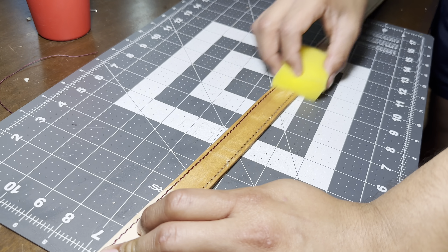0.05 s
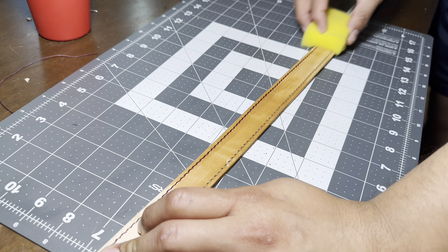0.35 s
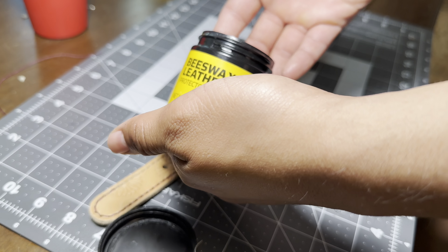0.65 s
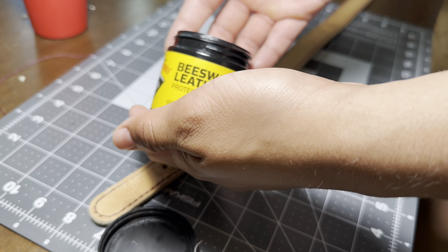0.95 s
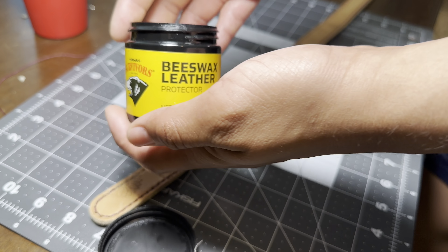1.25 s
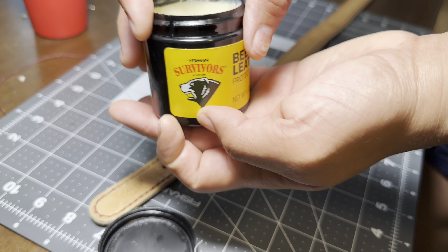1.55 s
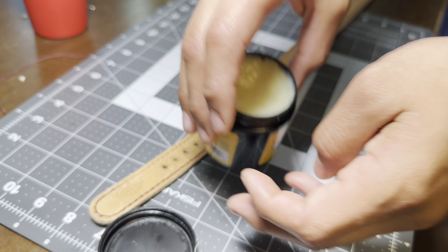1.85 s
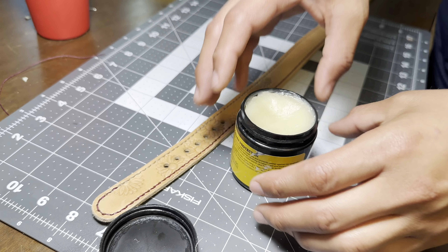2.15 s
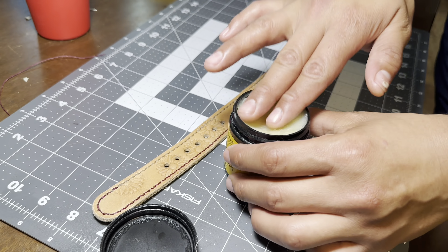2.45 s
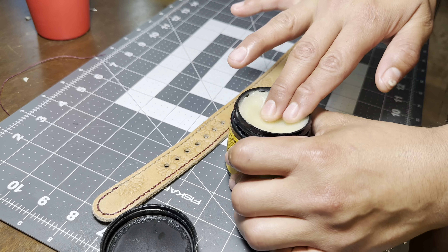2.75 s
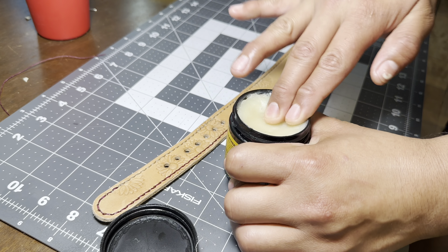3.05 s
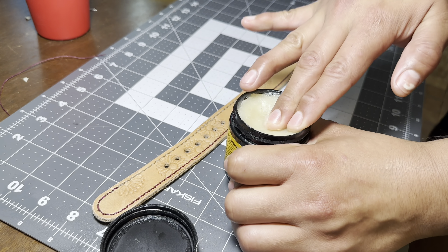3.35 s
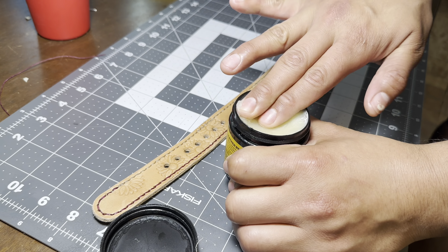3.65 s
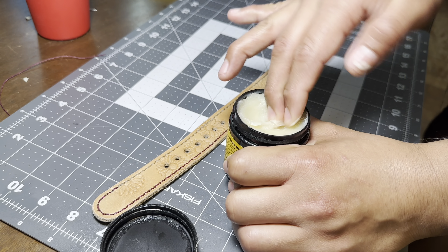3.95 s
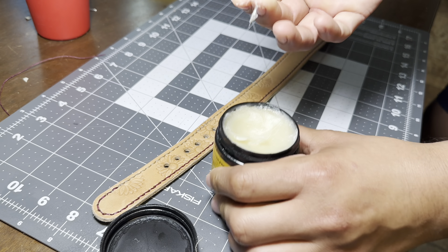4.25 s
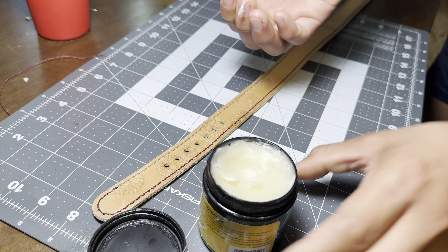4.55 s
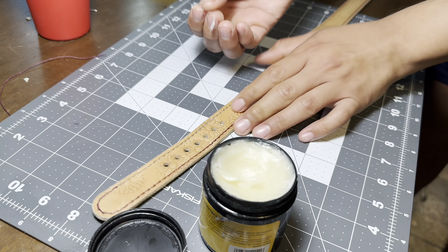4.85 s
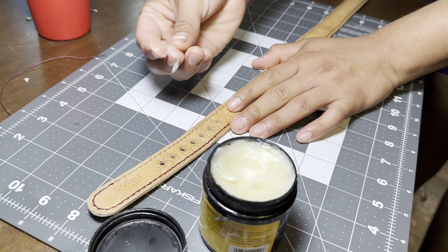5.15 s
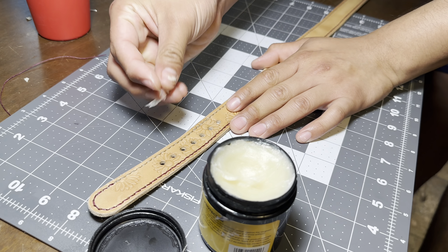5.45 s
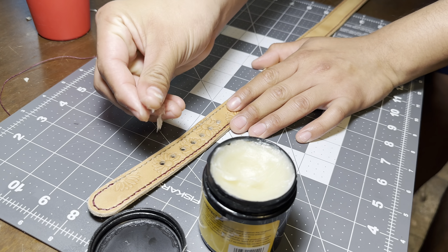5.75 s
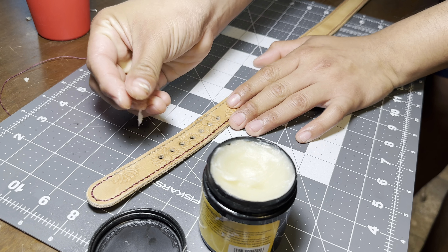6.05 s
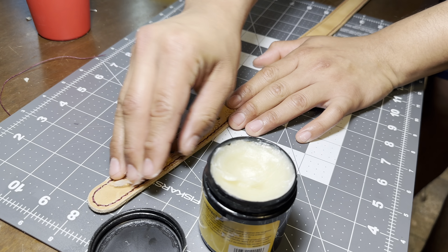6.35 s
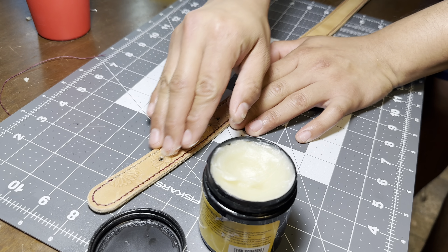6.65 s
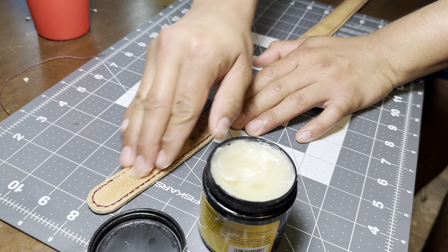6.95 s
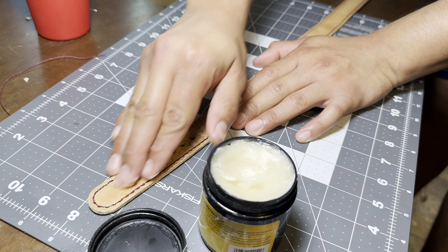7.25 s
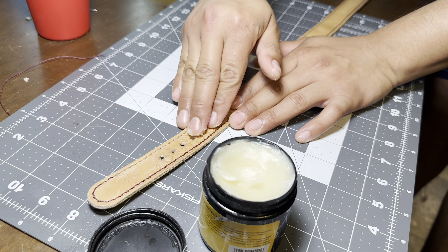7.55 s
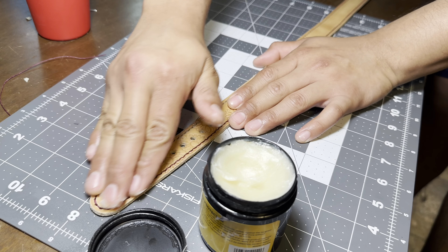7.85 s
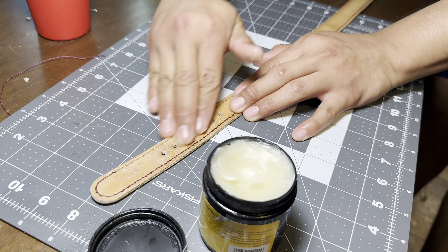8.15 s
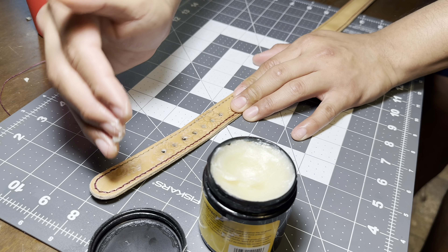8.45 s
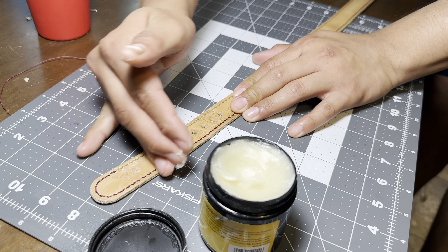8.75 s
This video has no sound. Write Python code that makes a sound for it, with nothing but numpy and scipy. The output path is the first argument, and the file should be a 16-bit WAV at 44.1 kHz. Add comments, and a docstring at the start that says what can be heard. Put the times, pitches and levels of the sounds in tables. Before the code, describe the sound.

A sponge wipes leather, a jar knocks down on a desk, then fingers scoop sticky wax and pat it into a strap.

```python
"""A leather strap is waxed on a cutting mat on a wooden desk, in a small room with a low hum.
First a sponge wipes the strap, its tiny slips blurring into hiss. A jar of wax slips out of a palm and is
set down hard, so the desk thuds and rings. Fingers scoop the sticky wax, whose threads snap, and push the
jar aside. A hand slides in to hold the strap, with a rising hollow note from the air under it.
Last, fingertips rub and pat the wax into the leather."""
import sys
import numpy as np
from scipy import signal
from scipy.fft import rfft, irfft, next_fast_len
from scipy.io import wavfile
from scipy.ndimage import uniform_filter1d

SR = 44100
rng = np.random.default_rng(int(sys.argv[2]) if len(sys.argv) > 2 else 0)


def digitize_waveform(pressure):
    """Quantize a signal to 16-bit integers and store it at the path in sys.argv[1].

    Rows of a 2-D input are taken as channels; values are limited to [-1, 1].
    """
    field = np.atleast_2d(pressure).T
    bounded = np.clip(field, -1, 1)
    quanta = np.round(bounded * 32767).astype(np.int16)
    wavfile.write(sys.argv[1], SR, quanta)


N = 397341
TIME = np.arange(N) / SR
HIT_TIME = TIME[:SR // 2]   # the clock for one short sound

# steady tones of distant motors: (pitch [Hz], level [dB])
HUM_TONES = [(49.3, -61.5), (70.5, -60.5), (101, -76)]
# the colour of each noise, or how strong it is from low to high: (frequency [Hz], level [dB])
BACKGROUND_COLOUR = [(15, -23), (28, -17.5), (40, -11.5), (65, -4.5), (110, -13.5), (200, -26.5),
                     (450, -37.5), (1000, -45.5), (2000, -42.5), (4000, -46.5), (6500, -31.5), (9500, -58),
                     (14000, -57.5)]
SPONGE_COLOUR = [(200, -1.5), (350, -0.5), (550, 0), (800, -5), (1500, -3), (3000, -1), (5000, -4.5),
                 (8500, 0), (11000, -4), (15000, -2.5)]
THUD_COLOUR = [(40, -17), (85, -5.5), (150, -9.5), (350, -1), (600, 1.5), (760, -1), (950, -9.5),
               (1400, -19), (2500, -36), (8000, -55.5)]
BOOM_COLOUR = [(90, -0.5), (140, 9), (230, -2), (400, -36), (2000, -70)]
PALM_COLOUR = [(250, -20), (650, -17), (1100, -7.5), (2000, -5.5), (3200, -5), (5000, 0), (8500, -1.5),
               (14000, -14)]
CRACK_COLOUR = [(500, -2.5), (1400, 4), (2400, -3.5), (3200, -2.5), (4400, -14), (6500, -12), (10000, -20),
                (15000, -25)]
JAR_COLOUR = [(170, -9), (250, -9.5), (350, -0.5), (480, 2), (590, 8), (740, -4.5), (920, -5), (1400, -7.5),
              (2200, -18), (4000, -37), (8500, -40.5), (15000, -48.5)]
WAX_COLOUR = [(200, -2), (400, 2.5), (600, -1), (850, -8), (1300, -12.5), (2500, -8), (4500, -11.5),
              (8500, -14), (14000, -21.5)]
SNAP_COLOUR = [(1000, -63), (3000, -9), (6000, -12), (8500, 5), (14500, 13), (16000, -22.5)]
HAND_COLOUR = [(200, -0.5), (380, -9), (560, 2.5), (800, 1.5), (1250, 7), (2300, 5.5), (4000, -9.5),
               (7000, -12.5), (10000, -20.5), (15000, -27.5)]
STRAP_COLOUR = [(200, -10), (400, -1), (570, -6), (780, -8.5), (1200, -5.5), (1950, -9), (2600, -5.5),
                (4500, -4.5), (8500, -1), (11000, -5), (15000, -3)]
PAT_COLOUR = [(150, -1), (300, 5), (560, 7), (780, 1.5), (1100, 8), (1900, 6), (2500, -3), (3200, -1),
              (5000, -8.5), (8000, -16), (15000, -81)]
# resonances, the narrow bands where an object changes a noise: (centre [Hz], width [Hz], boost [dB])
MAT_PEAKS = [(558.4, 5.3, 10.8), (1215, 120, 7.1), (1926, 19, 9.7)]
JAR_PEAKS = [(352, 31, 12.5), (600, 91, -4.5), (930, 15, 14), (1100, 240, 5.5)]
STRAP_PEAKS = [(565, 55, 8), (1100, 100, 4), (1340, 90, 4), (1960, 90, 6), (2610, 140, 2), (3170, 130, 3)]
# the tones an object rings with when struck: (pitch [Hz], level [dB], time to fade by 60 dB [s])
DESK_TONES = [(80, -18.5, 0.12), (136.6, -24, 0.34), (213, -20, 0.27), (259.5, -13, 0.12),
              (365.5, 2, 0.027), (341.5, -12, 0.24), (382, -18.5, 0.073), (467.4, -17.5, 0.6),
              (568.5, -7.5, 0.12), (600, -15.5, 0.21), (650, -13, 0.069), (726, -17, .15), (850, -25, 0.15),
              (928, -24, 0.26), (1144, -27.5, 0.18), (1330, -29, 0.1)]
JAR_TONES = [(1150, -5, .016), (1420, 0, .014), (1900, -4, .014), (2650, -7, .014), (3200, -5, .018),
             (6300, -14, .012)]
STRAP_TONES = [(368, -5.5, 0.25), (559, 17, 0.14), (1018, 14, 0.074), (1166, 3, 0.11), (1520, -15, 0.15),
               (1896, 18, 0.18), (2450, -20.5, 0.048), (3200, -27.5, 0.048)]
# rubbing strokes: (start [s], length [s], scrape below 3 kHz [dB], hiss above 3 kHz [dB])
SPONGE_WIPES = [(-0.07, .31, -61.5, -47.5), (0.255, .11, -67.5, -55.5), (0.36, 0.12, -71.5, -56),
                (0.45, 0.11, -71.5, -62.5), (0.588, .08, -66, -57)]
PALM_SLIPS = [(1.22, 0.29, -59, -68.5), (1.37, 0.21, -69.5, -75), (1.575, 0.13, -77.5, -71.5),
              (1.78, 0.137, -78.5, -69), (2.2, 0.19, -67.5, -79)]
JAR_SHOVES = [(2.03, 0.22, -51.5, -55), (2.11, 0.097, -52.5, -65), (4.095, 0.35, -42.5, -59),
              (4.31, 0.18, -54.5, -61.5), (4.38, 0.23, -64.5, -70.5)]
WAX_SCOOPS = [(2.378, 0.07, -58.5, -63), (2.44, 0.13, -55, -69), (2.58, 0.091, -79.5, -72),
              (2.665, 0.069, -59, -71.5), (2.73, 0.28, -70, -69), (2.835, 0.055, -63, -76),
              (2.97, 0.26, -71.5, -73), (3.17, 0.24, -68.5, -75), (3.45, 0.19, -75, -74),
              (3.63, 0.22, -68.5, -73), (3.82, 0.16, -71.5, -80.5), (3.985, 0.092, -57, -63)]
HAND_SLIDES = [(4.66, 0.44, -48, -55), (4.72, 0.47, -48, -42.5)]
FINGER_RUBS = [(5.765, 0.12, -71, -75.5), (6.36, .18, -75.5, -64.5), (6.645, 0.19, -73, -62.5),
               (6.86, 0.23, -70, -61), (7.135, 0.22, -65.5, -62), (7.355, 0.19, -67.5, -60),
               (7.605, 0.2, -68.5, -61.5), (7.845, 0.26, -62, -57.5), (8.09, .19, -68, -65.5),
               (8.58, 0.47, -69.5, -63.5)]
# soft low thuds on the desk, from the hands and the rocking jar: (time [s], level [dB])
SOFT_THUDS = [(0.168, -53.5), (0.397, -55), (0.995, -60.5), (2.549, -50), (2.851, -42), (3.045, -55.5),
              (3.467, -59.5), (3.558, -57), (3.9856, -46), (4.845, -37.5), (5.2969, -40.5), (5.435, -50.5),
              (6.446, -52.5), (8.212, -55.5)]
# hand taps, wax squelches and a tap on the jar: (time [s], level [dB], pitch [Hz], width [Hz], time to fade by
# 60 dB [s])
HOLLOW_TAPS = [(1.111, -55, 1684, 1840, 0.2), (2.456, -35.5, 1100, 204, 0.17),
               (2.456, -42, 2956, 700, 0.12), (3.062, -56.5, 1310, 901, 0.14),
               (3.178, -53.5, 1620, 600, 0.13), (3.255, -58.5, 986, 400, 0.15),
               (3.292, -52, 1100, 507, 0.046), (3.487, -51, 3200, 2000, 0.011),
               (3.546, -60, 1100, 398, 0.036), (3.718, -51, 1370, 905, 0.15),
               (4.0402, -36.5, 2240, 1810, 0.011), (4.7649, -21, 1313, 606, 0.017),
               (5.245, -55, 1910, 1194, 0.095), (5.2963, -39.5, 756, 712, 0.063),
               (5.4356, -57.5, 652, 400, 0.047)]
# the jar lands, rocks, settles, and later jolts when shoved: (time [s], thud [dB], crack [dB])
JAR_KNOCKS = [(1.8886, -6, -5), (1.9002, -11, -12.5), (1.9114, -6, -5), (1.948, -47, -18.5),
              (1.968, -15, -17), (2.025, -54, -33), (2.033, -31.5, -47), (2.069, -50, -33.5),
              (2.1037, -47.5, -38), (2.159, -33, -36.5), (4.385, -35.5, -38)]
# the loudest wax threads snap: (time [s], level [dB])
WAX_SNAPS = [(2.3994, -45), (2.4089, -52), (2.7416, -47.5), (2.7633, -42.5), (3.0235, -47.5),
             (3.0792, -44.5), (3.1213, -41), (3.46, -43), (3.487, -29), (3.5029, -37.5), (3.516, -40.5),
             (4.0415, -37.5), (7.94, -36), (8.267, -50)]
# the note of the air under the sliding hand: (time [s], pitch [Hz], level [dB])
HOLLOW_NOTE = [(4.75, 1275, -79), (4.775, 1280, -44), (4.828, 1280, -49.5), (4.881, 1400, -41),
               (4.921, 1750, -54), (4.959, 2285, -40.5), (5.02, 2455, -65), (5.119, 2380, -86.5)]
# fingertips land on the strap: (time [s], level [dB])
FINGER_PATS = [(6.318, -42), (6.442, -51), (6.629, -35.5), (7.156, -29), (7.18, -40), (7.627, -32),
               (7.701, -51), (8.139, -33.5), (8.212, -47.5), (8.561, -38), (8.986, -49)]
# first echoes from near surfaces: (delay [s], level [dB])
NEAR_ECHOES = [(.0082, -16.5), (0.0106, -12)]
# how long the room rings: (frequency [Hz], time to fade by 60 dB [s])
ROOM_FADE = [(100, 0.99), (400, 0.47), (1500, 0.23), (4000, 0.32), (8000, 0.21), (15000, 0.16)]
# how alike left and right are: (frequency [Hz], likeness [1 same, -1 opposite])
STEREO_LIKENESS = [(100, .97), (280, .8), (550, .45), (1100, .25), (2000, .3), (3000, -.1), (4300, .3),
                   (7400, .15), (8600, .8), (9700, 0), (10700, -.95), (12200, -.95), (13400, .95)]
# how much louder the left side is: (frequency [Hz], left minus right [dB])
STEREO_BALANCE = [(70, 1.6), (250, 2.6), (500, 4), (1200, 1.6), (4000, 2.6), (9000, .5), (14000, 0)]


def from_db(db):
    """Turn decibels into a gain, a number to multiply by."""
    return 10 ** (np.asarray(db) / 20)


def rms_one(x):
    """Scale x so that its average strength (rms) is 1."""
    return x / np.sqrt(np.mean(x ** 2) + 1e-20)


def peak_one(x):
    """Scale x so that its biggest swing is 1."""
    return x / np.abs(x).max()


def at_hz(table, hz):
    """Read between the rows of a table, giving each octave equal room."""
    frequencies, values = np.transpose(table)
    return np.interp(np.log(hz + 1), np.log(frequencies), values)


def filtered(x, gain):
    """Turn each frequency in x up or down by gain(hz)."""
    size = next_fast_len(x.shape[-1] + 2048, True)
    hz = np.arange(size // 2 + 1) * SR / size
    return irfft(rfft(x, size) * gain(hz), size)[..., :x.shape[-1]]


def coloured(x, colour, peaks=()):
    """Give x a colour and resonances; it falls away below the colour's lowest frequency."""
    def gain(hz):
        boost = sum(db / (1 + (2 * (hz - centre) / width) ** 2) for centre, width, db in peaks)
        return from_db(at_hz(colour, hz) + boost) * np.minimum(hz / colour[0][0], 1) ** 2
    return filtered(x, gain)


def drift(turns_per_s):
    """A random curve that wanders around 0, typically by about 1."""
    points = rng.standard_normal(N // 40)
    return np.interp(TIME * turns_per_s, np.arange(len(points)), points)


def add(out, time_s, sound):
    """Mix a sound into out at the given time."""
    start = round(time_s * SR)
    out[:, start:start + sound.shape[-1]] += sound[:, :N - start]


def fade(fade_s):
    """A gain that drops by 60 dB every fade_s seconds."""
    return from_db(-60 * HIT_TIME / fade_s)


def burst(colour, fade_s, peaks=(), rise_s=1 / SR):
    """A hit makes noise that dies away; a soft hit takes longer to rise."""
    noise = coloured(rng.standard_normal((2, len(HIT_TIME))), colour, peaks)
    return peak_one(noise * fade(fade_s) * np.minimum(HIT_TIME / rise_s, 1))


def ringing(tones, spread_db):
    """A struck object rings with fading tones, whose strengths vary from blow to blow."""
    hz, db, fade_s = np.array(tones).T[:, :, None]
    strength = from_db(db + spread_db * rng.standard_normal(hz.shape))
    waves = strength * fade(fade_s) * np.exp(2j * np.pi * hz * HIT_TIME)
    mid = (-1) ** np.arange(len(tones)) @ waves.imag   # every second tone starts the other way
    # the side part puts left and right slightly out of step
    side = .6 * rng.choice([-1, 1], len(tones)) @ waves.real * np.minimum(HIT_TIME / .001, 1)
    return np.array([mid, side]) / np.abs(mid).max()


def narrow_noise(hz, width_hz, size):
    """A breathy note: noise in one narrow band, whose pitch may move."""
    lowpass = signal.butter(2, width_hz / 2, fs=SR, output="sos")
    wobble = signal.sosfilt(lowpass, rng.standard_normal((2, 2, size + SR // 10)))[..., -size:]
    phase = 2 * np.pi * np.cumsum(hz * np.ones(size)) / SR
    return rms_one(wobble[0] * np.cos(phase) + wobble[1] * np.sin(phase))


def stroke_gains(strokes, scrape_power, hiss_power, skew):
    """Each stroke speeds up, then slows; faster is louder, and a skew over 1 makes it peak late."""
    scrape, hiss = np.zeros((2, N))
    for start, length, scrape_db, hiss_db in strokes:
        during = (TIME > start) & (TIME < start + length)
        progress = (TIME[during] - start) / length
        speed = np.abs(np.sin(np.pi * progress ** skew))
        scrape[during] += from_db(scrape_db) * speed ** scrape_power
        hiss[during] += from_db(hiss_db) * speed ** hiss_power
    soften_s = 0.048   # skin gives way, so strokes fade in and out
    return uniform_filter1d(np.array([scrape, hiss]), size=round(soften_s * SR))


def friction(gains, colour, peaks, slips_per_s, grain_db, spread_db, judder_db):
    """Rubbing: countless tiny slips blur into hiss, bigger ones sound grainy, and the pressure shakes."""
    scrape_gain, hiss_gain = gains
    slips = rng.random(N) < slips_per_s / SR
    sizes = from_db(spread_db * np.minimum(rng.exponential(1, N), 4))
    blur = rng.standard_normal((2, N))
    grain = from_db(grain_db) * rms_one(slips * sizes * rng.standard_normal((2, N)))
    pressure = from_db(judder_db * drift(75))
    sound = coloured((blur + grain) * pressure, colour, peaks)
    scrape = filtered(sound, lambda hz: 1 / (1 + (hz / 3000) ** 6))
    hiss = sound - scrape
    return rms_one(scrape) * scrape_gain + rms_one(hiss) * hiss_gain


def room_echoes(x):
    """A wash of echoes arrives after a few milliseconds; low notes last longest."""
    t = TIME[:SR * 2 // 3]
    noise, tail = rng.standard_normal((2, len(t))), 0
    for centre, fade_s in ROOM_FADE:
        band = [(hz, hz == centre) for hz, _ in ROOM_FADE]
        tail += filtered(noise, lambda hz: at_hz(band, hz)) * from_db(-60 * t / fade_s)
    tail *= np.clip(t / 0.0078 - 1, 0, 1)
    tail /= np.sqrt(np.sum(tail[0] ** 2))
    return signal.fftconvolve(x, tail, axes=1)[:, :N]


def in_room(x, wash_db):
    """The sound itself, two near echoes and the room's wash of echoes."""
    out = x + from_db(wash_db) * room_echoes(x)
    for delay, db in NEAR_ECHOES:
        add(out, delay, from_db(db) * x)
    return out


def stereo(x):
    """Make left and right from the two rows of x: both share the mid row and get the side row opposed."""
    mid = filtered(x[0], lambda hz: np.sqrt(1 + at_hz(STEREO_LIKENESS, hz)))
    side = filtered(x[1], lambda hz: np.sqrt(1 - at_hz(STEREO_LIKENESS, hz)))
    left = filtered(mid + side, lambda hz: from_db(at_hz(STEREO_BALANCE, hz) / 2))
    right = filtered(mid - side, lambda hz: from_db(-at_hz(STEREO_BALANCE, hz) / 2))
    return np.array([left, right])


def placed(x, left_db, left_lead_s):
    """A sound off to one side is louder there, and its lower range arrives there sooner."""
    left, right = stereo(x)
    right = filtered(right, lambda hz: np.exp(-2j * np.pi * hz * left_lead_s / (1 + (hz / 3000) ** 4)))
    return np.array([left * from_db(left_db / 2), right * from_db(-left_db / 2)])


def room_hum():
    """Distant motors hum over low rumble and faint hiss."""
    hum = np.zeros((2, N))
    for hz, db in HUM_TONES:
        strength = np.sqrt(2) * from_db(db + .5 * drift(4))
        hum[0] += strength * np.sin(2 * np.pi * hz * TIME + .5 * drift(2.5))
    background = coloured(rng.standard_normal((2, N)), BACKGROUND_COLOUR)
    return hum + from_db(-64) * rms_one(background)


def sponge_wipes():
    """A sponge rubs to and fro on the leather with a smooth hiss."""
    gains = stroke_gains(SPONGE_WIPES, scrape_power=0.47, hiss_power=0.84, skew=0.93)
    return friction(gains, SPONGE_COLOUR, MAT_PEAKS,
                    slips_per_s=3700, grain_db=-8.5, spread_db=0.5, judder_db=0.75)


def desk_blows(blows):
    """Each blow makes the desk top thud and ring."""
    thud, ring = np.zeros((2, 2, N))
    damping_db_per_s = 45   # hands and jar resting on the desk shorten its ring
    for time_s, db, *_ in blows:
        add(thud, time_s + .001, from_db(db - 6.5) * burst(THUD_COLOUR, fade_s=.05, rise_s=.001))
        ring_gain = from_db(db - damping_db_per_s * HIT_TIME)
        add(ring, time_s, ring_gain * ringing(DESK_TONES, spread_db=0.77))
    return in_room(thud, wash_db=-9.5) + ring


def soft_thuds():
    """The hands and the rocking jar thud softly on the desk, and its deep boom builds up just after."""
    out = desk_blows(SOFT_THUDS)
    for time_s, db in SOFT_THUDS:
        add(out, time_s + 0.0118, from_db(db - 8) * burst(BOOM_COLOUR, fade_s=0.3, rise_s=0.01))
    return out


def hollow_taps():
    """Each tap or squelch gives a brief hollow note."""
    out = np.zeros((2, N))
    rise = np.minimum(HIT_TIME / 0.0004, 1)
    for time_s, db, hz, width_hz, fade_s in HOLLOW_TAPS:
        note = narrow_noise(hz, width_hz, len(HIT_TIME)) * rise * fade(fade_s)
        add(out, time_s, from_db(db) * peak_one(note))
    return out


def palm_slips():
    """The jar rubs over the skin as it slips, and the hand takes hold again."""
    gains = stroke_gains(PALM_SLIPS, scrape_power=0.82, hiss_power=0.93, skew=0.88)
    return friction(gains, PALM_COLOUR, peaks=(), slips_per_s=500, grain_db=-6, spread_db=5, judder_db=2)


def jar_knocks():
    """The jar hits with a sharp crack and a short clack, and shakes the desk."""
    contact = np.zeros((2, N))
    for time_s, _, db in JAR_KNOCKS:
        crack = from_db(-0.5) * burst(CRACK_COLOUR, fade_s=0.02)
        clack = from_db(-4.5) * ringing(JAR_TONES, spread_db=4)
        add(contact, time_s, from_db(db) * (crack + clack))
    return desk_blows(JAR_KNOCKS) + in_room(contact, wash_db=-12.5)


def jar_shoves():
    """The jar scrapes over the mat, which stirs its resonances."""
    gains = stroke_gains(JAR_SHOVES, scrape_power=3.54, hiss_power=2.2, skew=1.07)
    return friction(gains, JAR_COLOUR, JAR_PEAKS,
                    slips_per_s=290, grain_db=-13.5, spread_db=2, judder_db=2.5)


def wax_scoops():
    """Fingers circle in the wax with a grainy rub and lift out."""
    gains = stroke_gains(WAX_SCOOPS, scrape_power=0.82, hiss_power=0.98, skew=0.9)
    return friction(gains, WAX_COLOUR, MAT_PEAKS, slips_per_s=500, grain_db=-2, spread_db=5, judder_db=3)


def wax_snaps():
    """Wax threads break with short, bright ticks; six faint ones come at random during the scooping."""
    out = np.zeros((2, N))
    faint_snaps = [(time_s, -58) for time_s in rng.uniform(2.7, 3.8, size=6)]
    for time_s, db in list(WAX_SNAPS) + faint_snaps:
        tick = burst(SNAP_COLOUR, fade_s=.003) * [[1], [.6]]   # a weaker side row
        add(out, time_s, from_db(db) * peak_one(tick))
    return out + from_db(-13.5) * room_echoes(out)


def sliding_hand():
    """Palm, then fingers, swish over the mat; the hollow under the hand flattens, so its note rises."""
    times, hz, db = np.transpose(HOLLOW_NOTE)
    note_gain = from_db(np.interp(TIME, times, db)) * (TIME > times[0]) * (TIME < times[-1])
    note = note_gain * narrow_noise(np.interp(TIME, times, hz), width_hz=340, size=N)
    gains = stroke_gains(HAND_SLIDES, scrape_power=3, hiss_power=4.3, skew=0.96)
    return note + friction(gains, HAND_COLOUR, MAT_PEAKS,
                           slips_per_s=2000, grain_db=-6.5, spread_db=3, judder_db=1.1)


def finger_rubs():
    """Waxy fingertips rub together, then along the strap, with a fine sticky crackle."""
    gains = stroke_gains(FINGER_RUBS, scrape_power=0.39, hiss_power=0.49, skew=0.85)
    return friction(gains, STRAP_COLOUR, STRAP_PEAKS,
                    slips_per_s=440, grain_db=-10.5, spread_db=4.5, judder_db=1.5)


def finger_pats():
    """Waxy fingertips smack the strap, which then slaps the mat and rings."""
    out = np.zeros((2, N))
    for time_s, db in FINGER_PATS:
        smack = from_db(db - 4) * burst(CRACK_COLOUR, fade_s=.009)
        slap = from_db(db) * burst(PAT_COLOUR, fade_s=0.036, peaks=STRAP_PEAKS)
        ring = from_db(db - 11) * ringing(STRAP_TONES, spread_db=2)
        add(out, time_s, smack)
        add(out, time_s + .0015, slap + ring)
    return out


def scene():
    """Mix it all: the holding hand is a little to the right, the strap a little to the left."""
    middle = room_hum() + sponge_wipes() + soft_thuds() + palm_slips()
    middle += jar_knocks() + jar_shoves() + wax_scoops() + wax_snaps()
    hand = in_room(hollow_taps(), wash_db=-11.5) + sliding_hand()
    hand = placed(hand, left_db=-1.5, left_lead_s=-0.00016)
    strap = finger_rubs() + in_room(finger_pats(), wash_db=-9.5)
    strap = placed(strap, left_db=0.4, left_lead_s=0.000087)
    return from_db(-2.5) * (stereo(middle) + hand + strap)


def record(dry):
    """Deep rumble is cut, the level dips briefly, and the highest treble is cut."""
    rumble_cut = signal.butter(6, 38, "high", fs=SR, output="sos")
    treble_cut = signal.ellip(10, .1, 70, 16000, fs=SR, output="sos")
    dip = from_db(-22 * np.exp(-((TIME - .657) / 0.017) ** 2))
    dipped = signal.sosfilt(rumble_cut, dry) * dip
    return signal.sosfiltfilt(treble_cut, np.clip(dipped, -1, 1))


dry = scene()
out = record(dry)
digitize_waveform(out)
```